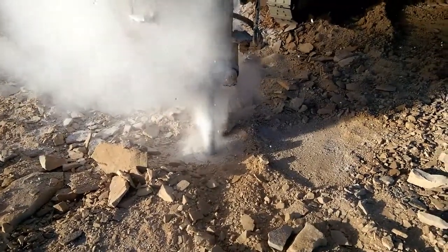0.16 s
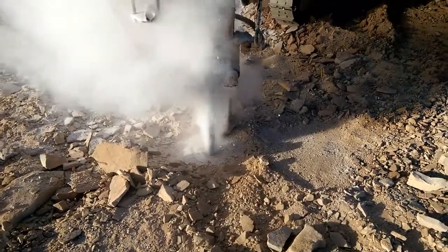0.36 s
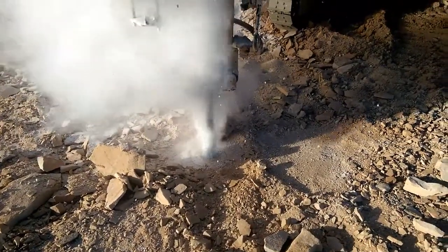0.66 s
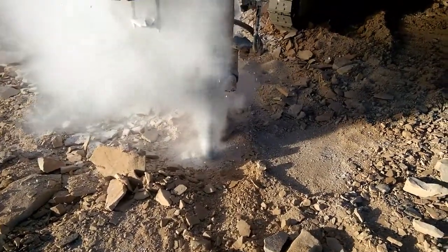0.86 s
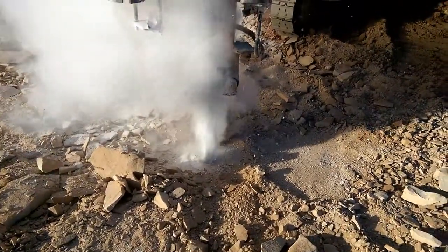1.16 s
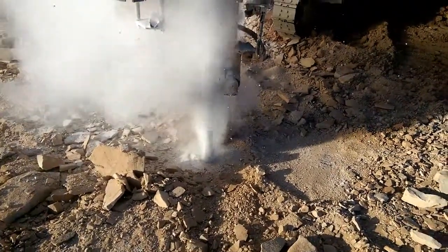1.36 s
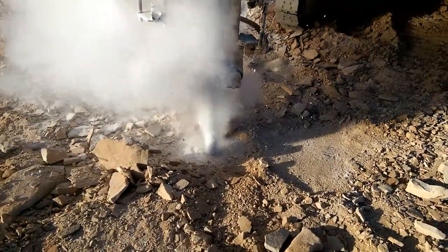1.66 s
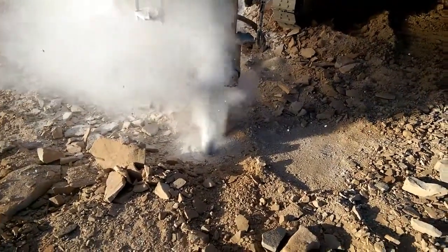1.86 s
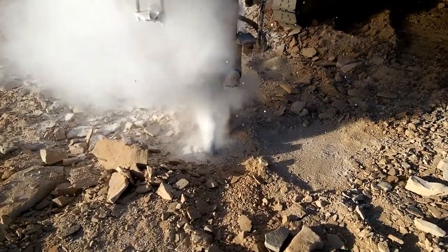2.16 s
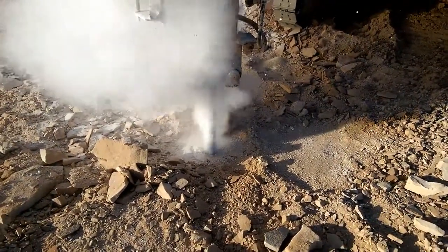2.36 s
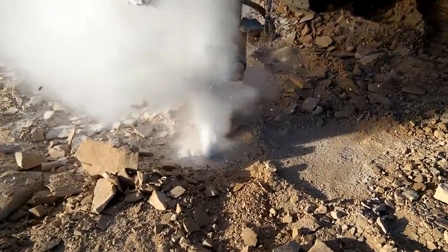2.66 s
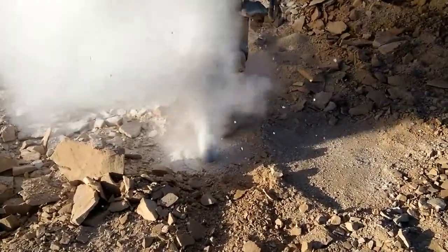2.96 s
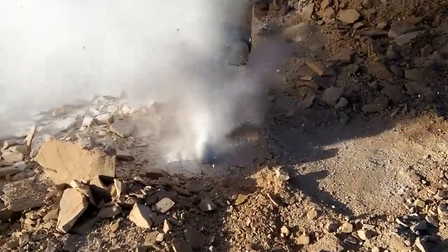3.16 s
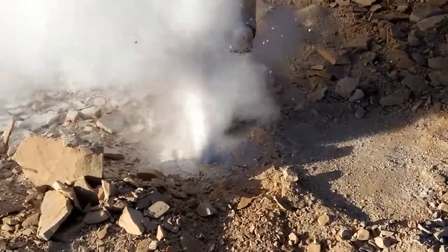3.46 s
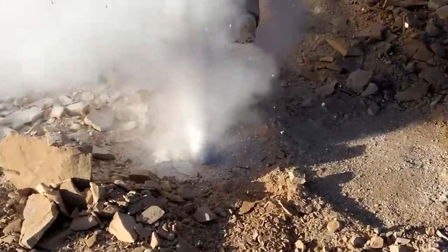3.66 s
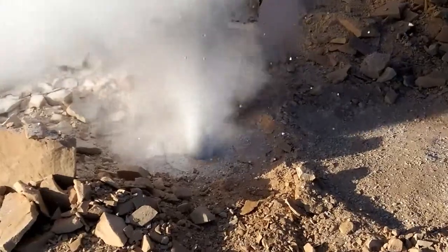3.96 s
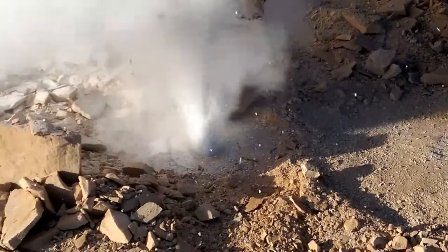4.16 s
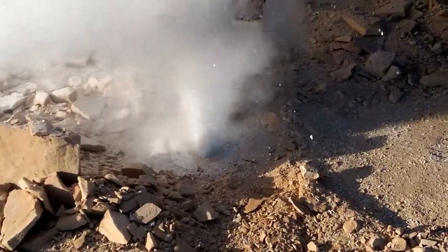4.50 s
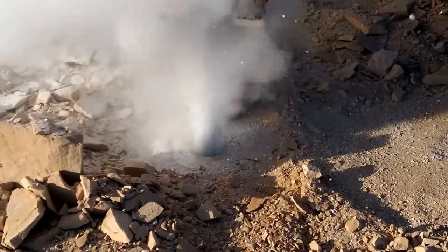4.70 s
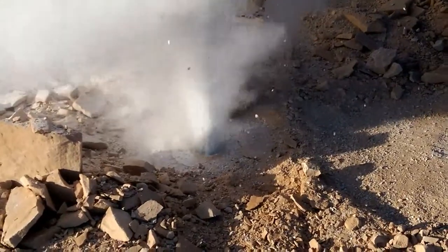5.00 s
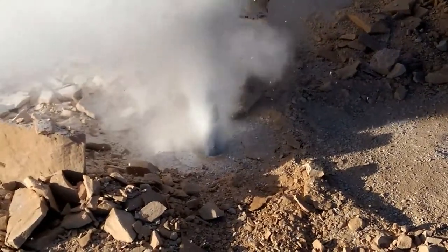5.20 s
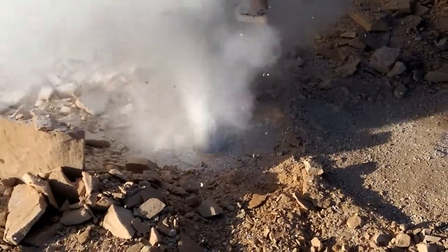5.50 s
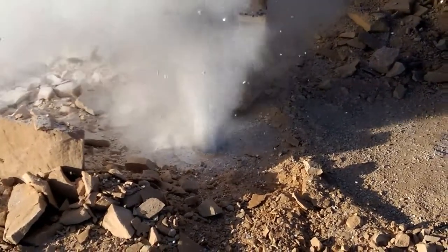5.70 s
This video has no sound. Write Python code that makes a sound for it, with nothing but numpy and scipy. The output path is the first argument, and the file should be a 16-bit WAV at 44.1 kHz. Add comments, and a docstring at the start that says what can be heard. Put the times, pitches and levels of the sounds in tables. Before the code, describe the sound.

From 0 to about 5.8 seconds a rock drill hammers without a break, already at full speed at the start. Roughly 41 blows a second blur into a harsh, grainy rattle. Each blow is a short, dull knock strongest around 1 to 2 kHz, preceded by two tiny bright cracks and followed by weak uneven reflections off rocks. The steel rod rings with many inharmonic metallic pitches, kept jangling by the loose chuck and swelling subtly about twice a second as it turns. Wide, gritty air roars from the hole, pulsing with the blows. Hammering is strongest near 2.5 seconds, then eases slightly by 5; the thuds gradually gain low body while the ringing weakens a little. Air rises a touch after 5.4 seconds. A faint, unsteady diesel hum around 110 to 165 Hz sits behind. Close, dry outdoor stereo; loud peaks are softly rounded, and some upper ringing leans left.

```python
"""A rock drill hammers close by, about 41 blows a second, each one a dull thud out of the hole.
Each blow also makes the steel rod ring, and the rattling chuck keeps it ringing between blows.
Two bright cracks run ahead of each thud. Noise shaped as flushing air and grit roars from the hole.
Behind it a diesel engine hums: low noise with three unsteady tones.
Two close microphone ports hear the drill from one side."""
import sys
import numpy as np
from scipy import signal
from scipy.fft import rfft, irfft, next_fast_len
from scipy.io import wavfile
from scipy.ndimage import uniform_filter1d, map_coordinates

SR = 44100
rng = np.random.default_rng(int(sys.argv[2]) if len(sys.argv) > 2 else 0)


def wav_record(signal):
    """Record a signal, one row per channel, as 16-bit PCM in the file named by sys.argv[1]."""
    frames = np.transpose(np.atleast_2d(signal))
    bounded = np.clip(frames, -1, 1)
    # unit amplitude maps onto the largest positive 16-bit level
    quanta = np.round(bounded * 32767).astype(np.int16)
    wavfile.write(sys.argv[1], SR, quanta)


N = 257544  # length in samples


def amp(db):
    """Turn decibels into a gain."""
    return 10 ** (np.asarray(db) / 20)


def unit(x):
    """Scale a sound to rms 1."""
    return x / np.sqrt(np.mean(x ** 2) + 1e-20)


def along(points, hz):
    """Read a curve of (pitch_hz, value) points on a log pitch axis."""
    point_hz, values = np.transpose(points)
    return np.interp(np.log(hz + 1), np.log(point_hz + 1), values)


def curves(rows, s):
    """Read each column after the time at the moments s."""
    knots, *columns = np.transpose(rows)
    return [np.interp(s, knots, column) for column in columns]


def wobble(rate, size=64):
    """A smooth random curve with rate knots a second, drawn every size samples."""
    coarse = np.arange(0, N + size, size)
    knots = rng.standard_normal(int(N * rate / SR) + 4)
    smooth = map_coordinates(knots, [coarse * rate / SR])
    return np.interp(np.arange(N), coarse, smooth)


def filtered(x, response):
    """Multiply the spectrum of x by a response, which may shift phase too."""
    m = next_fast_len(N + SR // 2)
    spectrum = rfft(x, m) * response(np.fft.rfftfreq(m, 1 / SR))
    return irfft(spectrum, m)[..., :N]


def pulses(s, size):
    """Single-sample clicks of the given sizes at the moments s."""
    places = np.clip(np.round(s * SR).astype(int), 0, N - 1)
    return np.bincount(places, size, N)


def fading(x, t60):
    """Let each click die away by 60 dB in t60 seconds."""
    return signal.lfilter([1], [1, -amp(-60 / (t60 * SR))], x)


def sides(db):
    """Left and right gains for a left-minus-right level difference."""
    return amp(np.array([db, -db]) / 2)


def resonance(x, hz, width):
    """Play x through one ringing mode of the given pitch and width in Hz, at rms 1."""
    pole = np.exp(-np.pi * width / SR)
    return unit(signal.lfilter([1, 0, -1], [1, -2 * pole * np.cos(2 * np.pi * hz / SR), pole ** 2], x))


# How much louder the left is than the right: pitch_hz, left_minus_right_db
SIDE_BALANCE = [(60, -1), (200, -1), (700, -1), (1500, -5), (2600, 2), (4800, -1), (8000, -0.5),
                (15000, -5.5)]
# How alike left and right noise are before the side balance: pitch_hz, likeness (1 = the same)
NOISE_LIKENESS = [(30, .3), (60, 0.94), (130, 0.88), (300, 0.97), (800, 0.97), (1800, 0.87), (2500, 0.21),
                  (6000, 0.2), (15000, 0.081)]


def rush(spectrum, patchy_db):
    """Stereo noise of rms 1, with random louder and softer patches in time and pitch."""
    z = signal.stft(rng.standard_normal((2, N)), nperseg=512)[2]
    patches = rng.standard_normal(z.shape[1:])
    patches = uniform_filter1d(patches, size=6, axis=0)  # smooth over pitch
    patches = uniform_filter1d(patches, size=10, axis=1)  # smooth over time
    pair = signal.istft(z * amp(patchy_db * unit(patches)), nperseg=512)[1][:, :N]

    def shares(hz):
        turn = np.arccos(np.clip(along(NOISE_LIKENESS, hz), 0, 1)) / 2
        return amp(along(spectrum, hz)) * [np.cos(turn), np.sin(turn)]

    mid, side = filtered(pair, shares)
    stereo = np.array([mid + side, mid - side])
    return unit(filtered(stereo, lambda hz: sides(along(SIDE_BALANCE, hz))))


# Tone color of the engine noise: pitch_hz, relative_level_db (per Hz)
ENGINE_NOISE = [(15, -45), (25, -11), (80, 0.5), (113, 6.5), (220, -2), (262, -16), (300, 7), (390, -28),
                (660, -120)]
# Engine firing tones: pitch_hz, level_db (before the lift and wobble below)
ENGINE_TONES = [(110, -51.5), (124, -54), (165, -51.5)]


def diesel():
    """The engine's low rumble, with firing tones that waver in level and phase."""
    t = np.arange(N) / SR
    tones = np.zeros(N)
    for hz, db in ENGINE_TONES:
        level = amp(db + 2.5 + 2.4 * wobble(5.04))
        tones += level * np.sin(2 * np.pi * hz * t + 1.05 * wobble(5))
    rumble = amp(-43.5 + 1.5 * wobble(6)) * rush(ENGINE_NOISE, patchy_db=-1.0)
    return tones + rumble


def shake(s, db, rise_s, t60):
    """The shudder of each blow: it builds up from 2.5 ms ahead, then dies away."""
    dying = fading(pulses(s - .0025, amp(db - db.mean())), t60)
    lag = np.exp(-1 / (rise_s * SR))
    return signal.lfilter([1 - lag], [1, -lag], dying)


# Tone color of the rushing air: pitch_hz, relative_level_db (per Hz)
AIR_NOISE = [(120, -25), (200, -14.5), (997, -6.5), (1180, -12), (2230, -2.5), (2580, -9.5), (3270, -3),
             (3850, -14.5), (5970, -7.5), (8290, -13), (9950, -11), (13100, -13), (15700, -32)]


def air(s, db):
    """Flushing air roars from the hole; each blow adds a puff of grit."""
    puff = 5 + .5 * shake(s, db, rise_s=0.00036, t60=0.04)
    gusts = amp(.5 * wobble(4) + .7 * wobble(12))
    return unit(puff * gusts * rush(AIR_NOISE, patchy_db=2.5))


BLOWS_PER_S, FIRST_BLOW_S = 41.309, .0101  # the even beat, before drift and jitter
TURNS_PER_S = 2.295  # the rod's rotation
BITE_DB, BITE_S = 0.26, 0.678  # once a turn the bit bites harder: swing, and a moment of the hardest bite
# The hammer runs unevenly: start_s, late_ms (before jitter)
HAMMER_DRIFT = [(0, -0.2), (0.2, 1.4), (0.3, -0.7), (0.7, -2.2), (1, -1.7), (1.2, 0.0), (1.75, 1.4),
                (2.75, 2.3), (3, 1.4), (3.2, -0.7), (3.55, -0.7), (3.8, -3.1), (4.5, -1.5), (4.8, 2.1),
                (5.1, 2.4), (5.5, 0.6), (5.65, -2.7), (5.84, -1.5)]
# How hard the blows land: start_s, level_db (before bite and scatter)
BLOW_FORCE = [(0, -12.5), (1.1, -11.2), (2.5, -10.5), (4, -12), (5, -13.5), (5.84, -13.5)]


def blows(jitter_ms=.28, scatter_db=.9):
    """Moments and levels of the piston's blows, nearly even but never exactly so."""
    count = int((N / SR - FIRST_BLOW_S) * BLOWS_PER_S) + 1
    s = FIRST_BLOW_S + np.arange(count) / BLOWS_PER_S
    (late_ms,), (db,) = curves(HAMMER_DRIFT, s), curves(BLOW_FORCE, s)
    db = db + BITE_DB * np.cos(2 * np.pi * TURNS_PER_S * (s - BITE_S))
    chance = rng.standard_normal((len(s), 2))
    slip = chance[:, 0] + np.roll(chance[:, 0], shift=1)  # a late blow delays the next one too
    return s + (late_ms + jitter_ms * slip) / 1000, db + scatter_db * chance[:, 1]


# Tone color of the cracks: pitch_hz, relative_level_db (per Hz)
CRACK_NOISE = [(2000, -40), (6000, -16), (10000, -2), (13500, -9), (16000, -3)]


def tick(s, db, t60=.006):
    """Piston on shank: two short bright cracks run ahead of each thud."""
    luck = rng.standard_normal((len(s), 2))
    first = pulses(s - .0024, amp(db + 3 * luck[:, 0]))
    second = pulses(s - .0012, amp(db + 2 * luck[:, 1]))
    return amp(-8.5) * fading(first + second, t60) * rush(CRACK_NOISE, patchy_db=-3)


def travel_s(hz, spread=.13):
    """Bending waves run faster at high pitch: the treble of a blow arrives before its 1 kHz thud."""
    return spread * (1 / np.sqrt(hz + 600) - 1 / np.sqrt(1600))


RING_TURN_S = 0.707  # sets when in each turn the rod's modes face the listener
# Bending modes of the rod, relative to one another:
# pitch_hz, width_hz, level_db, left_minus_right_db, change_db_per_s (as the rod sinks)
ROD_MODES = [(1174.6, 36, -27, -4.5, 0.2), (1290, 28, -33, -2, 0), (1449, 28, -30.5, -2.5, -0.3),
             (1675, 56, -26.5, -5, 1.04), (1881, 22, -28, -7, -1.14), (2191, 50, -30, 1, 0),
             (2421, 26, -29, -3.5, 0), (2733, 28, -31, 12, 1), (2994, 35, -31.5, 6.5, 2.5),
             (3300, 37, -29, 2, 0.9), (3647, 27, -33.5, 8.5, 0), (3995, 11, -37.5, 6.5, 0.4),
             (4342, 38, -31.5, 6, 0.7), (4690, 34, -37, 10.5, 0.5), (5030, 47, -32.5, 12, 1.9),
             (5835, 31, -29.5, 6, 0.9), (6530, 26, -35, -1, 1.8), (7170, 58, -52, -0.5, -3.5),
             (7480, 39, -36.5, 0, -0.4), (7740, 31, -37.5, 6, 0.5), (8370, 34, -38.5, 4, -0.5),
             (8700, 64, -43, 5, -2), (9090, 52, -34.5, 0, 1), (9510, 67, -42.5, 6, -3.5),
             (9790, 68, -38, -8, 1.4), (10130, 64, -40.5, 6, -3), (10700, 82, -39.5, 4, 3),
             (11500, 76, -39, -10.5, 0.3), (12400, 100, -43.5, -18, 2.5), (13100, 97, -38.5, -8, -0.1)]


def rod(s, db, rattle_db=-27, alike=0.58, low_hz=1800, split=0.003):
    """Every blow kicks each bending mode by a new amount; the chuck's rattle drives it in between."""
    t = np.arange(N) / SR
    shudder = 0.38 + shake(s, db, rise_s=0.0024, t60=0.079)
    rattle = amp(rattle_db) * shudder * rng.standard_normal((3, N))
    out = np.zeros((2, N))
    # above the table the modes go on, weak and evenly spaced
    upper = [(13170 + 440 * k, 90, -44 - .8 * k, -6.5, 0) for k in range(5)]
    for order, (hz, width, level_db, pan_db, sink_db) in enumerate(list(ROD_MODES) + upper):
        # low modes answer each blow alike and at once; high ones by chance,
        # as the wave runs up and down the rod
        steady = 1 / (1 + (hz / low_hz) ** 4)
        luck = rng.standard_normal((len(s), 4))
        force = amp(db - db.mean())[:, None]
        kicks = force * (1.1 * steady + (.75 - 0.38 * steady) * luck[:, :3])
        late_s = travel_s(hz) + .004 * (1 - steady) * np.abs(luck[:, 3])
        drive = (1 - 0.77 * steady) * rattle + [pulses(s + late_s, kick) for kick in kicks.T]
        # the rod bends in two planes at slightly different pitch
        planes = [amp(2.64 * wobble(12)) * resonance(drive[k], hz * (1 + way * split), width)
                  for k, way in enumerate((-1, 1))]
        # a third drive sounds opposite on the two sides and widens the ring
        turn = np.arccos(np.clip(alike + 0.31 * steady, 0, 1)) / 2
        shared = unit(sum(planes)) * np.cos(turn)
        apart = resonance(drive[-1], hz, width) * np.sin(turn)
        # the ring swells and fades as the rod turns, each mode at its own moment
        swing = np.cos(2 * np.pi * TURNS_PER_S * (t - RING_TURN_S) - 1.266 * order)
        facing_db = (0.36 + 1.8 * steady) * swing
        gain = amp(level_db + sink_db * (t - t.mean()) + facing_db)
        out += gain * sides(pan_db)[:, None] * [shared + apart, shared - apart]
    return unit(out)


# Tone color of each thud: pitch_hz, relative_level_db
THUD_COLOR = [(30, -40), (80, -26), (200, -43), (350, -14.5), (550, -11.5), (780, -4.5), (920, -8),
              (1200, 1), (1500, -1), (1800, -4), (3500, -31), (8000, -35), (15000, -29)]


def thud(s, db):
    """The blow itself: a short swept pulse, with weaker uneven copies off the rocks."""
    hits = pulses(s, amp(db))
    for delay_s, echo_db in [(.0036, -17.5), (.008, -9.5), (.0128, -13.5)]:
        luck = rng.standard_normal((len(s), 2))
        size = amp(db + echo_db) * (0.64 + 0.27 * luck[:, 1])
        hits = hits + pulses(s + delay_s + 0.00022 * luck[:, 0], size)
    # adding up the travel times over pitch gives the phase of the sweep
    grid = np.fft.rfftfreq(next_fast_len(N + SR // 2), 1 / SR)
    phase = 2 * np.pi * np.cumsum(travel_s(grid)) * grid[1]

    def response(hz):
        color = amp(along(THUD_COLOR, hz)) * sides(along(SIDE_BALANCE, hz))
        return color * np.exp(-1j * (phase + 1.29))

    return amp(32.5) * filtered(hits, response)


RING_DB, RING_DB_PER_S = -15.5, -0.21  # the ringing at the start; it weakens as the rod sinks
BASS_DB, BASS_DB_PER_S = -2, 1.25  # the deepening hole strengthens the low end of the thud
# Air flow: start_s, level_db
AIR_FLOW = [(0, -20.5), (1.5, -20), (2.3, -21), (3, -20), (5, -21), (5.4, -19.5), (5.84, -18)]
# The microphone turns a little: start_s, left_minus_right_db (added to each sound's own balance)
MIC_TURN = [(0, -0.7), (1.2, -0.8), (1.6, 0.1), (4.5, 0.2), (5.84, 0)]


def scene():
    """Mix thud, cracks, ringing rod and air as the drill, and set the diesel behind it."""
    s, db = blows()
    t = np.arange(N) / SR
    (air_db,), (pan_db,) = curves(AIR_FLOW, t), curves(MIC_TURN, t)
    blow = thud(s, db)
    bass = filtered(blow, lambda hz: 1 / (1 + (hz / 950) ** 8))
    deeper = (amp(BASS_DB + BASS_DB_PER_S * t) - 1) * bass
    ringing = amp(RING_DB + RING_DB_PER_S * t) * rod(s, db)
    drill = blow + deeper + tick(s, db) + ringing + amp(air_db) * air(s, db)
    return drill * sides(pan_db) + diesel()


TOP_HZ = 15750  # band limit
# How far the left port is ahead of the right: pitch_hz, lead_radians
LEFT_LEAD = [(20, 0), (300, .1), (700, .42), (1200, .9), (2150, 1.95), (2700, 2.9), (5900, 3.2),
             (8100, 9.3), (10200, 11.9), (13200, 16.8), (15500, 25.4)]


def record(dry):
    """The left port hears the sound first; peaks are softly rounded; nothing passes above the band limit."""
    ports = filtered(dry, lambda hz: np.exp(.5j * np.outer([1, -1], along(LEFT_LEAD, hz))))
    rounded = ports / (1 + np.abs(ports / .98) ** 6) ** (1 / 6)
    return filtered(rounded, lambda hz: hz < TOP_HZ)


dry = scene()
out = record(dry)
wav_record(out)
```